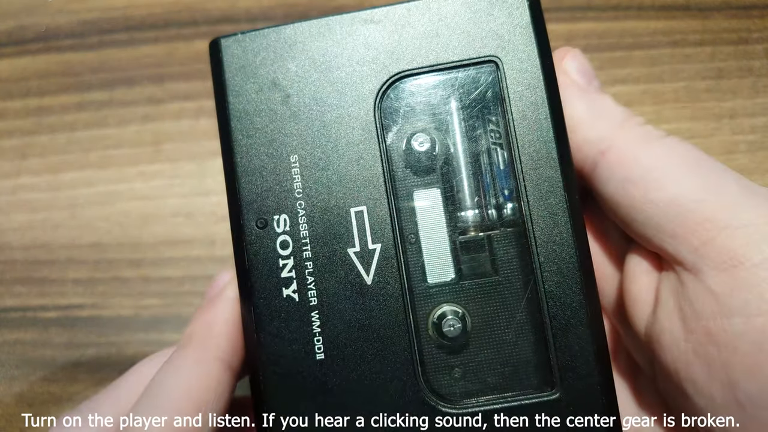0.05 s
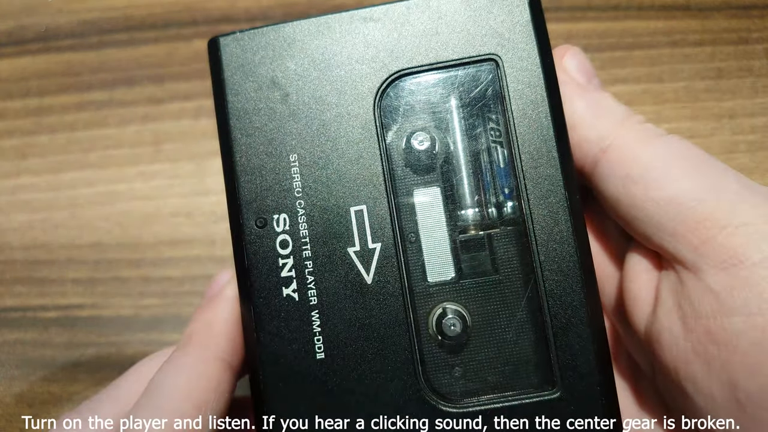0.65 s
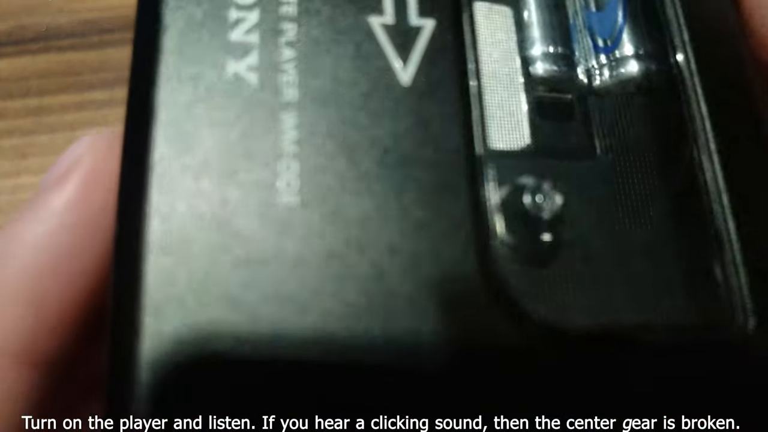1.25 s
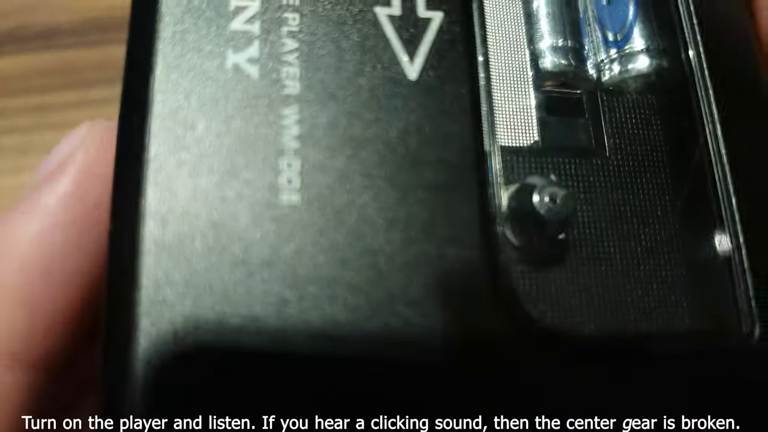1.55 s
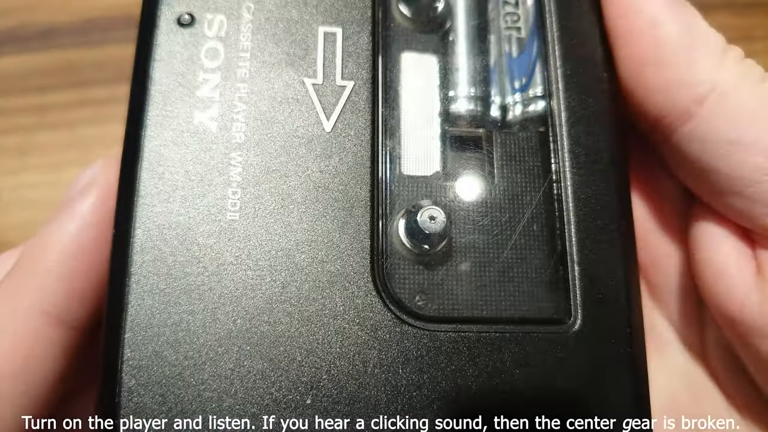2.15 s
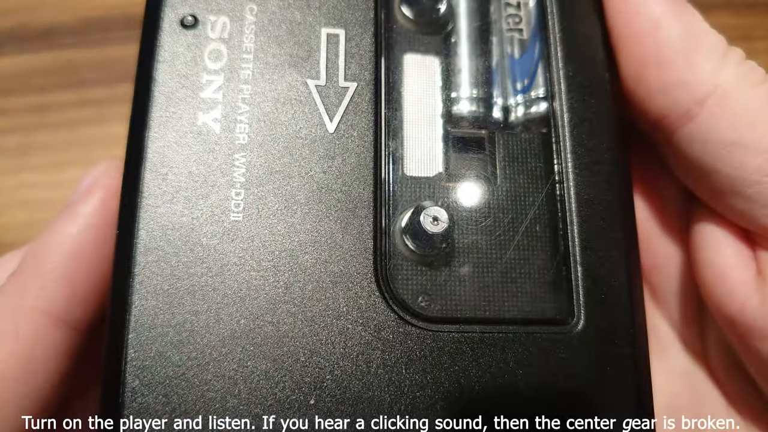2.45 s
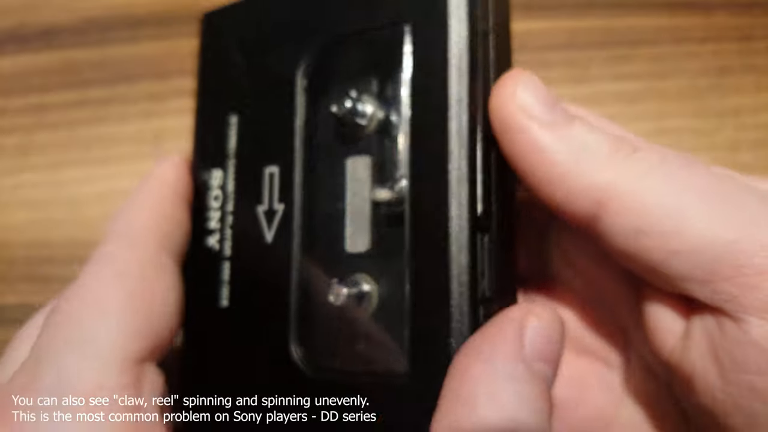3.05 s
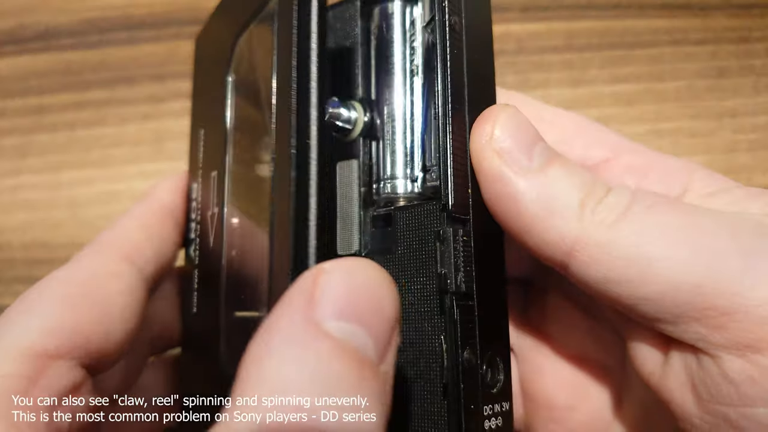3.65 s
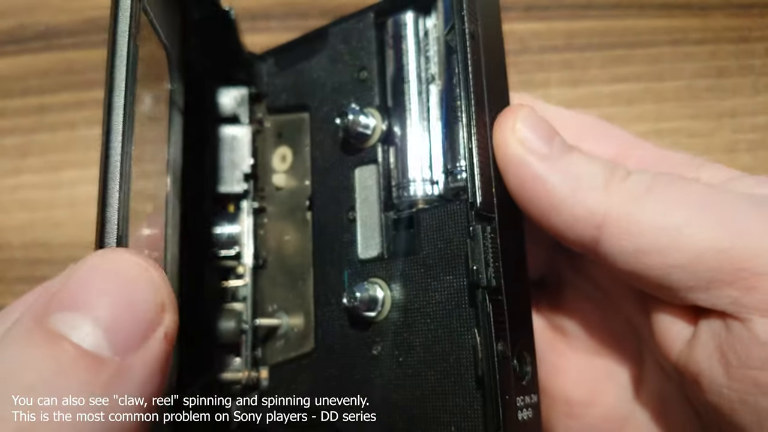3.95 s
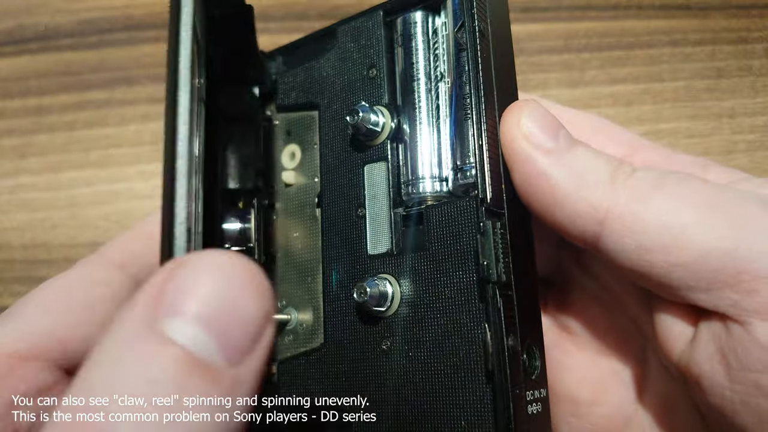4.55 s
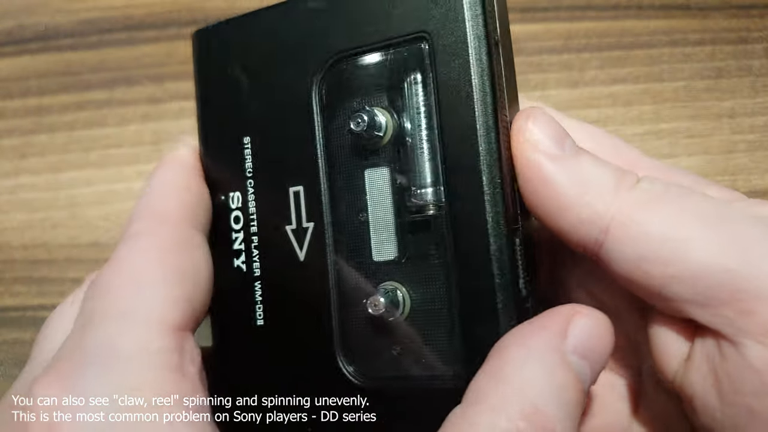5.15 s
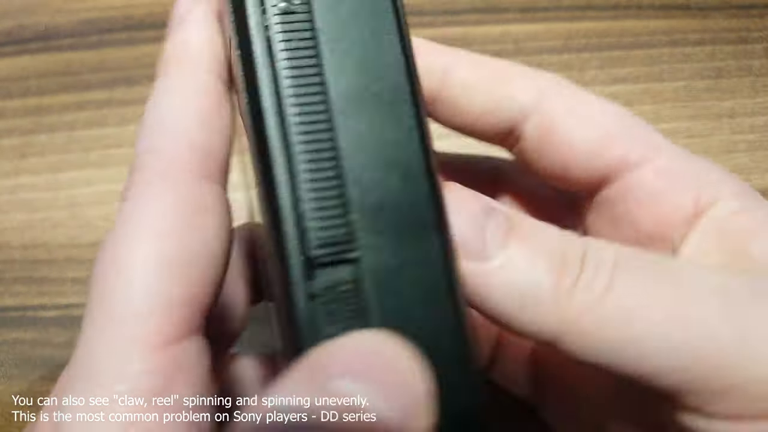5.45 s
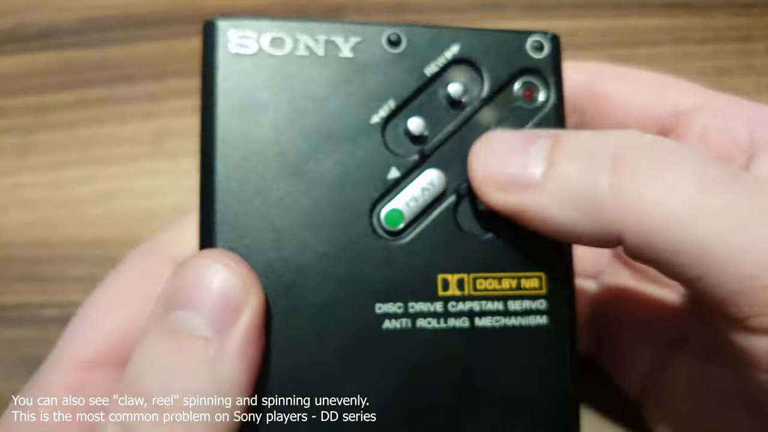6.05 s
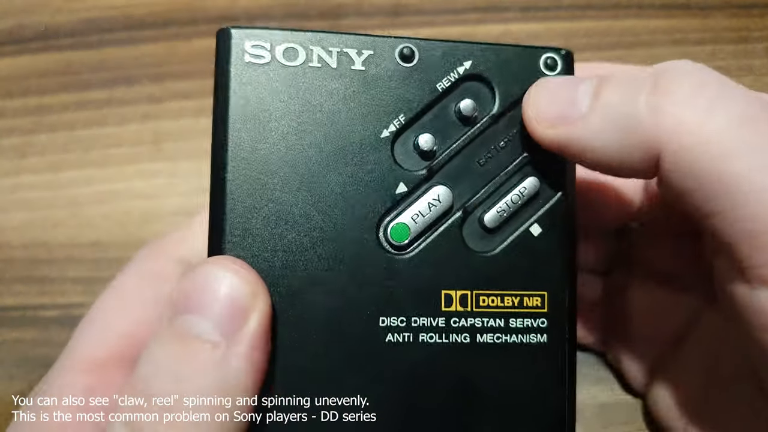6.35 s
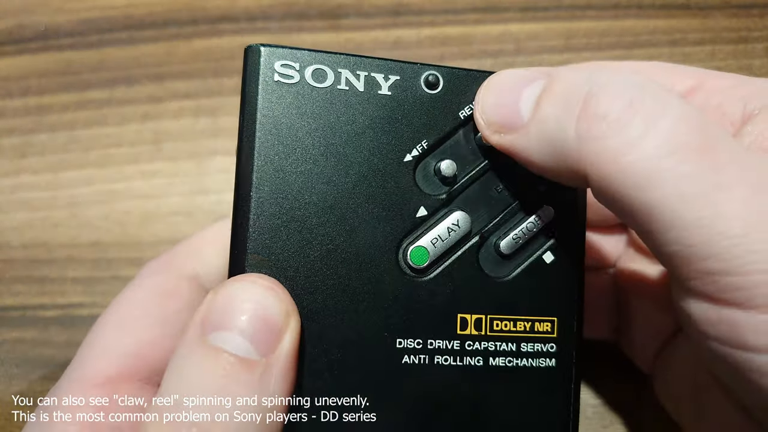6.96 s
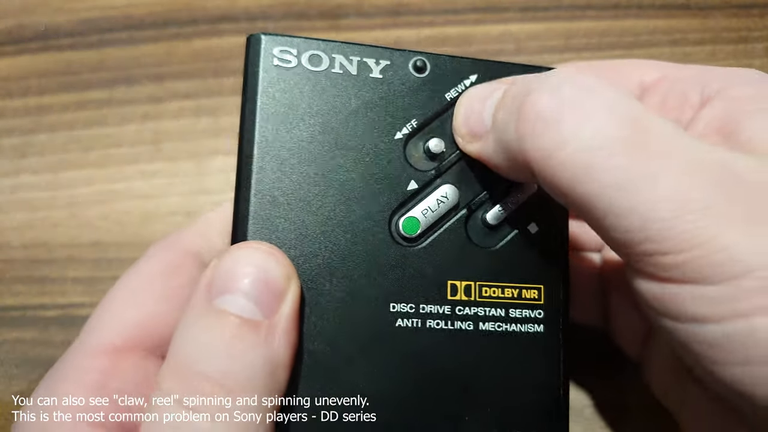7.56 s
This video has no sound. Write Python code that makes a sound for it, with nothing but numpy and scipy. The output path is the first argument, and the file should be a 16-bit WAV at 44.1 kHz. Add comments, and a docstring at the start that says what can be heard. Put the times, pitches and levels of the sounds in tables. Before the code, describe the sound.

Close, faint whirring and steady clicking from a cassette player's cracked gear, followed by a sharp latch crack, lid clacks and dry key clicks.

```python
"""A pocket cassette player runs in someone's hands, close by: its drive whirrs, its reel knocks softly,
and a cracked gear scrapes and snaps on every turn. The latch pops, the clicking ends and the whirr fades.
The lid swings open and is pressed shut, fingers slide over the shell and a thumb works the keys.
Each click is a short burst of noise that makes a part ring. A small room echoes and hums faintly."""
import sys
import numpy as np
from scipy import signal
from scipy.fft import rfft, irfft, next_fast_len
from scipy.io import wavfile
from scipy.ndimage import map_coordinates

SR = 44100
rng = np.random.default_rng(int(sys.argv[2]) if len(sys.argv) > 2 else 0)


def materialize(psi):
    """Save the field psi as 16-bit PCM at rate SR to the path in sys.argv[1].

    A 1-D psi becomes a single channel; in a 2-D psi each row is a channel.
    """
    bounded = np.clip(np.atleast_2d(psi).T, -1, 1)
    quanta = np.round(bounded * 32767).astype(np.int16)
    wavfile.write(sys.argv[1], SR, quanta)


N = 343980

# which side of the player faces the listener: (time [s], tilt [0 = window, 1 = lid])
TILT = [(0, 0), (.8, 0), (1.15, 0.65), (1.6, 1), (2.1, 0.92), (2.65, 1), (2.9, 0.091), (3.3, 0.25)]


def amp(db):
    """Turn decibels into a gain to multiply by."""
    return 10 ** (np.asarray(db) / 20)


def unit(x):
    """Scale a sound to an average (rms) level of 1."""
    return x / np.sqrt(np.mean(x ** 2) + 1e-20)


def along(points, hz):
    """Read a curve of (frequency, value) points at hz, on a log frequency axis."""
    freqs, values = np.transpose(points)
    return np.interp(np.log(hz + 1), np.log(freqs + 1), values)


def curve(points):
    """Join (time, value) points with straight lines, one value per sample."""
    return np.interp(np.arange(N) / SR, *np.transpose(points))


def wobble(rate):
    """A smooth random curve through `rate` random values a second."""
    values = rng.standard_normal(int(N * rate / SR) + 4)
    return map_coordinates(values, [np.arange(N) * rate / SR])


def swell(peak_s, length_s, rise_share):
    """A gain that climbs to 1 and falls away; it is 13 dB down at both ends of length_s."""
    t = (np.arange(N) / SR - peak_s) / length_s
    return amp(-13 * np.maximum(-t / rise_share, t / (1 - rise_share)))


def filtered(x, response):
    """Multiply each frequency in x by response(hz)."""
    length = x.shape[-1]
    padded = next_fast_len(length + 4096)
    hz = np.fft.rfftfreq(padded, 1 / SR)
    return irfft(rfft(x, padded) * response(hz), padded)[..., :length]


def shaped(x, colour):
    """Turn frequencies up or down along a curve of (frequency [Hz], gain [dB]) points."""
    return filtered(x, lambda hz: amp(along(colour, hz)))


def resonate(x, modes):
    """Let x ring a part's modes, its natural pitches; narrow modes ring longer."""
    return filtered(x, lambda hz: sum(
        amp(db) * 1j * hz * width / (pitch * pitch - hz * hz + 1j * hz * width)
        for pitch, width, db in modes))


def stereo_noise(likeness, size):
    """White noise in two channels; likeness lists (frequency [Hz], left-right match [-1 to 1])."""
    def weights(hz):
        angle = np.arccos(np.clip(along(likeness, hz), -1, 1)) / 2
        return np.array([np.cos(angle), np.sin(angle)])
    mid, side = filtered(rng.standard_normal((2, size)), weights)
    return np.array([mid + side, mid - side])


def add(track, s, sound):
    """Mix a sound into a track, starting at s seconds."""
    start = max(0, round(s * SR))
    track[:, start:start + sound.shape[1]] += sound[:, :N - start]


def room(x):
    """The small room's echo: each frequency dies away at its own speed."""
    # how long the echo lasts: (frequency [Hz], time to fall 60 dB [s])
    decay_times = [(200, 0.42), (1000, 0.3), (3000, 0.36), (6000, 0.24), (10000, 0.24), (16000, 0.2)]
    # the echo's tone: (frequency [Hz], level [dB])
    colour = [(200, -7.5), (1000, -3.5), (2700, -3.5), (5000, 0), (9000, -2.5), (16000, -2.5)]
    hz, t, noise = signal.stft(rng.standard_normal((2, SR // 2)), SR, nperseg=256)
    decay_db = -60 * t / along(decay_times, hz)[:, None] + along(colour, hz)[:, None]
    build_up = 1 - np.exp(-t / .005)
    tail = signal.istft(noise * amp(decay_db) * build_up, SR, nperseg=256)[1]
    return signal.fftconvolve(x, tail / np.linalg.norm(tail[0]), axes=1)


def contact(modes, band_dbs, chatter_s, rattle_db, crack_db, scatter_db, rise_s=.001):
    """One blow: parts chatter briefly and ring; band_dbs sets its thud, body, clack and tick."""
    # the thud, body, clack and tick bands: (low edge [Hz], high edge [Hz])
    bands = [(190, 800), (800, 1700), (1700, 7000), (7000, 17000)]
    t = np.arange(SR // 20) / SR
    # loose parts rattle on for a moment, one bump a millisecond
    bumps = map_coordinates(rng.standard_normal(64), [1000 * t])
    rattle = amp(rattle_db + 3.5 * bumps) * np.exp(-t / .008)
    envelope = (1 - np.exp(-(t / rise_s) ** 2)) * (np.exp(-t / chatter_s) + rattle)
    force = envelope * stereo_noise([(500, 0.63), (1300, 0.31), (2500, 0.17), (6000, 0.068)], len(t))
    # where the blow lands changes how strongly each mode rings
    struck = [(hz, width, db + scatter_db * rng.standard_normal()) for hz, width, db in modes]
    ring = unit(resonate(force, struck)) + amp(crack_db) * unit(force)
    sound = np.zeros_like(ring)
    for band, db in zip(bands, band_dbs):
        part = signal.sosfilt(signal.butter(3, band, "band", fs=SR, output="sos"), ring)
        energy = np.sum(part ** 2, axis=1, keepdims=True)
        sound += amp(db) * part / np.sqrt(energy / (SR / 100))  # level as if it lasted 10 ms
    return sound


def band_levels(colour, db, softness_db):
    """Levels of the four bands, starting from colour [dB]: a softer blow has more thud and less tick."""
    # change in (thud, body, clack, tick) [dB per dB of softness]
    softening = (0.6, 0.97, 0, -0.74)
    return [db + own + softness_db * gain for own, gain in zip(colour, softening)]


def blows(events, modes, colour, **texture):
    """A part of the casing is struck again and again, each blow with its own echo."""
    # the room gathers sound from every side of the casing, which blurs the modes
    blurred = [(hz, 2 * width, db) for hz, width, db in modes]
    out = np.zeros((2, N))
    for s, db, softness_db, pan_db, room_db in events:
        band_dbs = band_levels(colour, db, softness_db)
        near = contact(modes, band_dbs, scatter_db=2.5, **texture)
        all_round = contact(blurred, band_dbs, scatter_db=0.5, **texture)
        add(out, s, near * amp([[pan_db / 2], [-pan_db / 2]]))
        add(out, s, amp(room_db) * room(all_round))
    return out


def drive():
    """Belt and gear teeth rub in step with the motor shaft and whirr through the player's panels."""
    # modes of the hollow inside, the lid and the window: (pitch [Hz], width [Hz], level [dB])
    cavity_modes = [(442, 36, 6.5), (497, 22, -0.5)]
    lid_modes = [(940, 61, -15.5), (1113, 78, 4), (1214, 53, 6.5), (1360, 64, -16)]
    window_modes = [(1590, 150, -11.5), (1870, 130, 4.5), (1990, 280, 15), (2300, 170, 6),
                    (2550, 190, -9.5), (4173, 1500, -25)]
    # the whirr of those three parts: (level [dB], change at full tilt [dB])
    panel_levels = [(-67.5, 1), (-67.5, 7), (-64.5, -10.5)]
    # the drive fades as the lid comes open: (time [s], gain [dB])
    fade = [(0, 0.5), (3.3, -2), (3.6, -5), (4.05, -7), (4.3, -29)]
    shaft_hz = 37.24 * (1 + 0.011 * wobble(11))
    angle = 2 * np.pi * np.cumsum(shaft_hz) / SR
    # one swell per turn, three more for the motor's magnetic poles, and uneven teeth
    grip = amp(2 * np.cos(angle) + 0.84 * np.cos(3 * angle) + 0.73 * wobble(300))
    tilt = curve(TILT)
    out = np.zeros((2, N))
    for modes, (level_db, tilt_db) in zip((cavity_modes, lid_modes, window_modes), panel_levels):
        rub = grip * stereo_noise([(500, 0.84), (1300, 0.87), (3000, .3)], N)
        bass_cut_hz = 0.52 * modes[0][0]
        whirr = filtered(resonate(rub, modes), lambda hz: 1 / np.sqrt(1 + (bass_cut_hz / (hz + 1)) ** 8))
        out += amp(level_db + tilt_db * tilt) * unit(whirr)
    return amp(curve(fade)) * out * amp([[1], [-1]])  # a little to the left


def background():
    """Room air, rumble, a throbbing low drone and the microphones' own bright hiss."""
    # the tone of each noise: (frequency [Hz], relative level [dB])
    air_colour = [(20, 14), (70, -9), (110, -4), (160, -6), (230, -7.5), (290, -6.5), (360, -11.5),
                  (450, -11.5), (580, -19.5), (1000, -20.5), (2000, -23), (4000, -30), (8000, -40),
                  (16000, -50)]
    rumble_colour = [(12, 1.5), (22, -14), (33, -3.5), (46, 1.5), (55, -7.5), (68, -20.5), (140, -51.5)]
    hiss_colour = [(300, -5.5), (4000, 0), (5500, 0), (6400, -4.5), (7100, 0), (8400, -9), (10500, -4),
                   (12500, -2), (14500, 2.5), (16000, -3.5)]
    # how alike the air is in both ears: (frequency [Hz], match [-1 to 1])
    air_likeness = [(60, 0.87), (180, 0.86), (550, 0.27), (1650, -0.21), (4970, -0.49), (15000, -1.7)]
    air = unit(shaped(stereo_noise(air_likeness, N), air_colour))
    rumble = unit(shaped(stereo_noise([(40, 0.74)], N), rumble_colour))
    throb = amp(2.5 * wobble(4))
    drone = throb * np.sin(2 * np.pi * 47.8 * np.arange(N) / SR + .9 * wobble(6))
    hiss = unit(shaped(rng.standard_normal((2, N)), hiss_colour))
    room_noise = amp(-53) * air + amp(-52) * rumble + amp(-62.5) * drone
    return room_noise * amp([[-.7], [.7]]) + amp(-68.5) * hiss


def hum():
    """An appliance's steady hum, thin whistles, and a soft low tone that comes and goes."""
    # the hum and whistles: (pitch [Hz], level [dB])
    steady_tones = [(80.7, -72), (199.6, -65), (264, -74), (399, -88.5), (1334.5, -76.5), (2223, -90.5),
                    (6790, -91.5), (6990, -92)]
    # peaks of the low tone: (time [s], level [dB])
    peaks = [(.63, -61.5), (1.68, -61), (5.05, -68), (6.17, -65.5), (7.28, -68)]
    t = np.arange(N) / SR

    def tone(hz):
        return np.sqrt(2) * np.sin(2 * np.pi * hz * t + .12 * wobble(3))
    steady = sum(amp(db + wobble(0.91)) * tone(hz) for hz, db in steady_tones)
    swells = sum(amp(db) * swell(s, length_s=0.28, rise_share=.5) for s, db in peaks)
    return steady + swells * tone(hz=335)


def cracked_gear():
    """About three times a second the split in the gear catches with a scrape, slips, then snaps free."""
    # one row per turn: (time of the snap [s], scrape level [dB], snap level [dB])
    turns = [(0.047, -52.5, -49), (0.3468, -54, -46.5), (0.646, -54.5, -51), (0.9616, -54.5, -47),
             (1.2601, -54.5, -46), (1.5583, -55, -49), (1.873, -52, -50.5), (2.1703, -54.5, -47),
             (2.4679, -54.5, -49), (2.7823, -55.5, -48.5), (3.0799, -56.5, -50), (3.3778, -59.5, -51),
             (3.697, -67, -56.5)]
    # the tone of each step: (thud [dB], body [dB], clack [dB], tick [dB])
    catch_colour = (-16, 3.5, 0.5, -15)
    slip_colour = (-16.5, -16, -1, -7)
    snap_colour = (-20, -2.5, 0.5, -2.5)
    # the tone of the sliding teeth: (frequency [Hz], gain [dB])
    scrape_colour = [(1200, 0.5), (3200, 1), (6000, -1), (10000, -0.5)]
    catch_lead_s, slip_lead_s = .0256, 0.019
    gritty = dict(chatter_s=0.0047, rattle_db=-8, crack_db=-5, scatter_db=4.5, rise_s=.0009)
    clean = dict(chatter_s=.0012, rattle_db=-23, crack_db=-15.5, scatter_db=1.5)
    scrapes, snaps = np.zeros((2, N)), np.zeros((2, N))
    for s, scrape_db, snap_db in turns:
        # more body when the lid faces the listener
        facing_db = np.array([0, 6.5, 0, 0]) * np.interp(s, *np.transpose(TILT))
        slip_db = scrape_db - 8 + 5.5 * s  # the slip grows as the gear runs on
        add(scrapes, s - catch_lead_s, contact(CHASSIS, facing_db + catch_colour + scrape_db, **gritty))
        add(scrapes, s - slip_lead_s, contact(CHASSIS, facing_db + slip_colour + slip_db, **gritty))
        add(snaps, s, contact(CHASSIS, facing_db + snap_colour + snap_db, **clean))
    near = snaps + shaped(scrapes, scrape_colour)
    # the closed shell lets little treble out into the room
    muffled = filtered(near, lambda hz: 1 / (1 + 1j * hz / 6500))
    return near * amp([[1.4], [-1.4]]) + amp(-12) * room(muffled)[:, :N]


def reel():
    """The unevenly turning reel knocks dully inside the player's frame."""
    # the knocks: (time [s], level [dB], softness [dB])
    knocks = [(0.179, -61, 3), (0.5395, -44, -1.5), (1.168, -50, -1.5), (1.333, -51, 0), (1.453, -41, 2.5),
              (1.462, -60, 3), (1.496, -51.5, 3), (1.6606, -49, 1.5), (1.824, -50, 3), (1.988, -53.5, 1),
              (2.3177, -52, 2), (2.3642, -45, 2), (2.644, -57.5, 4), (2.712, -44.5, -15),
              (3.2752, -43.5, -6.5)]
    out = np.zeros((2, N))
    for s, db, softness_db in knocks:
        band_dbs = band_levels((-6.5, 0, -11.5), db, softness_db)  # thud, body and clack; no tick
        add(out, s, contact(CHASSIS, band_dbs, chatter_s=.0014, rattle_db=-13.5, crack_db=-28,
                            scatter_db=0))
    muffled = filtered(out, lambda hz: 1 / (1 + 1j * hz / 4500))
    return muffled * amp([[1.4], [-.6]]) + amp(-10) * room(muffled)[:, :N]


def latch():
    """The lid's latch gives and springs open with a bright crack."""
    # the cracks: (time [s], level [dB], softness [dB], left over right [dB], echo [dB])
    hits = [(3.4605, -52.5, 9.5, 8, -11), (3.4634, -36, 1, 3.5, -14), (3.7703, -31, 3.5, 7.5, -7),
            (3.7717, -16.5, -0.5, -0.5, -13.5)]
    # how the latch rings: (pitch [Hz], width [Hz], level [dB])
    modes = [(480, 130, -13.5), (1076, 130, -6), (1480, 190, -2), (1770, 200, 3), (2230, 120, -6),
             (2800, 440, -0.5), (3180, 400, -1), (4570, 220, -3), (5347, 320, -13), (6060, 590, -2),
             (11000, 2700, -2.5), (14000, 700, -5), (15100, 500, -5.5)]
    return blows(hits, modes, colour=(-30, -9, -1.5, -5.5), chatter_s=.002, rattle_db=-19.5, crack_db=-10)


def lid():
    """The lid hits its stop, shuts and is pressed home, with a full-bodied clack."""
    # the clacks: (time [s], level [dB], softness [dB], left over right [dB], echo [dB])
    hits = [(3.861, -18.5, 2, 2.5, -12.5), (3.8768, -40.5, 5.5, 1.5, -11.5), (4.6097, -62.5, 3, 0, -6),
            (4.6309, -59, 13.5, 0, -8), (4.816, -33.5, -2, 9, 1), (4.8214, -20.5, 2, 3, -17.5),
            (4.8323, -26.5, -3.5, 2, -14), (4.8472, -37, -8, 8, -18), (4.8497, -38, 15, 0, -11),
            (5.3759, -57.5, 6, 6, -6.5), (5.487, -51, 12.5, 2, -7.5), (5.5101, -31, 2, 1, -11),
            (5.646, -38.5, -3.5, 4, -5), (5.6493, -29.5, 8.5, 3, -15.5), (5.7626, -48.5, 7.5, 1, -11),
            (5.773, -54, -1, 14, -2)]
    # how the lid and shell ring: (pitch [Hz], width [Hz], level [dB])
    modes = [(236, 90, -22), (430, 28, -5.5), (545, 120, -3.5), (1180, 55, -4.5), (1291, 120, 6),
             (2076, 260, -2.5), (2530, 220, 6), (2840, 276, -1), (3566, 440, 2.5), (4280, 243, -0.5),
             (5200, 300, -4), (5700, 140, -12), (6900, 190, -10.5), (9900, 640, -7.5), (11130, 930, -7.5),
             (13500, 1000, -7), (15440, 800, -18.5)]
    return blows(hits, modes, colour=(-14, -6.5, 0.5, -5), chatter_s=.0022, rattle_db=-19, crack_db=-17)


def fingers():
    """Skin stutters finely over the matt shell and hisses; a soft fingertip is duller than a nail."""
    # the strokes: (time of the peak [s], length [s], level [dB], treble fades above [Hz])
    strokes = [(5.639, 0.11, -49, 12000), (5.77, .12, -55, 12000), (5.876, 0.33, -57, 12000),
               (6.078, 0.076, -60, 2500), (6.309, 0.073, -64.5, 9030), (7.44, 0.12, -61, 1500),
               (7.522, 0.12, -57.5, 4000), (7.72, 0.22, -62, 2190)]
    # the tone of rubbing skin: (frequency [Hz], relative level [dB])
    skin_colour = [(350, -37), (600, -15), (858, -19), (1070, -6), (1700, -18.5), (3990, -13),
                   (8990, -23.5), (15100, -15), (16000, -20)]
    grains = amp(1.6 * wobble(700) + 3.3 * wobble(40)) * rng.standard_normal((2, N))
    rub = np.zeros((2, N))
    for s, length_s, db, edge_hz in strokes:
        skin = unit(filtered(grains, lambda hz: amp(along(skin_colour, hz)) / (1 + 1j * hz / edge_hz)))
        rub += amp(db) * swell(s, length_s, rise_share=0.37) * skin
    return rub + amp(-9) * room(rub)[:, :N]


def keys():
    """A thumb works the keys, which click dryly."""
    # the clicks: (time [s], level [dB], softness [dB], left over right [dB], echo [dB])
    hits = [(6.7627, -64.5, 12, 1, -18), (7.144, -60.5, 6, -1, -9), (7.27, -65.5, 7, 5, -2.5),
            (7.4632, -46, 1, -1.5, -14), (7.494, -57.5, 17, -1, -6), (7.5025, -50, 15, 3, -2),
            (7.5105, -37.5, -4, 1, -6.5), (7.5262, -30, 0.5, 0.5, -17.5), (7.539, -52, 9, 14, -9),
            (7.644, -72.5, 27.5, 3, 0.5), (7.7028, -51, 15, -1, -7)]
    # how the keys ring: (pitch [Hz], width [Hz], level [dB])
    modes = [(720, 124, 0.5), (881, 130, -9), (1073, 150, 0), (1340, 200, -9), (1960, 140, -15),
             (2710, 270, 9), (3740, 480, 9.5), (4730, 450, 0), (5670, 340, -18), (7300, 270, -28),
             (11400, 3600, -7.5), (13800, 900, -16), (15300, 700, -20)]
    return blows(hits, modes, colour=(-24, -9, -0.5, -6.5), chatter_s=.0028, rattle_db=-21, crack_db=-20)


def scene():
    """The player, the hands on it and the room around it."""
    player = cracked_gear() + reel() + latch() + lid() + keys() + drive()
    return player + fingers() + hum() + background()


def record(dry):
    """Cut off the highest treble steeply."""
    top_hz = 16050
    return filtered(dry, lambda hz: 1 / np.sqrt(1 + (hz / top_hz) ** 200))


# how the frame that holds the gears rings: (pitch [Hz], width [Hz], level [dB])
CHASSIS = [(454.3, 82, -11), (929, 45, -24.5), (1192, 66, -4), (1283, 130, 3), (1720, 75, -12),
           (2010, 170, -7.5), (2365, 100.8, -6), (2670, 190, -4.5), (3180, 130, -10.5), (3590, 120, -12.5),
           (4120, 150, -15.5), (4680, 200, -17), (5640, 260, -14), (6280, 230, -21.5), (10140, 270, -9),
           (10850, 300, -14), (13800, 700, -24), (15600, 450, -17)]

dry = scene()
out = record(dry)
materialize(out)
```